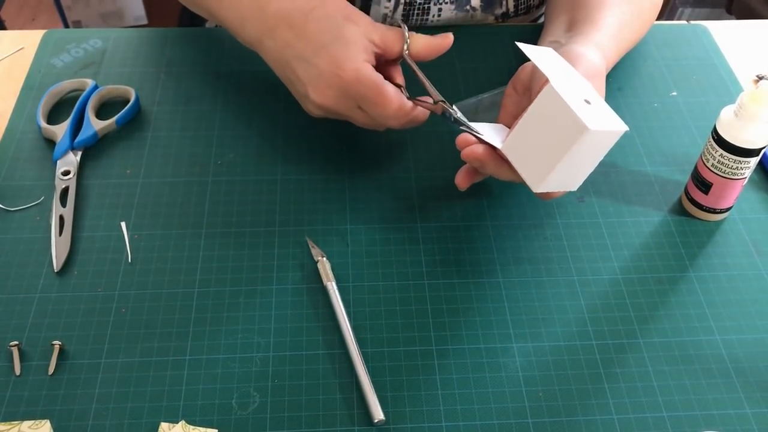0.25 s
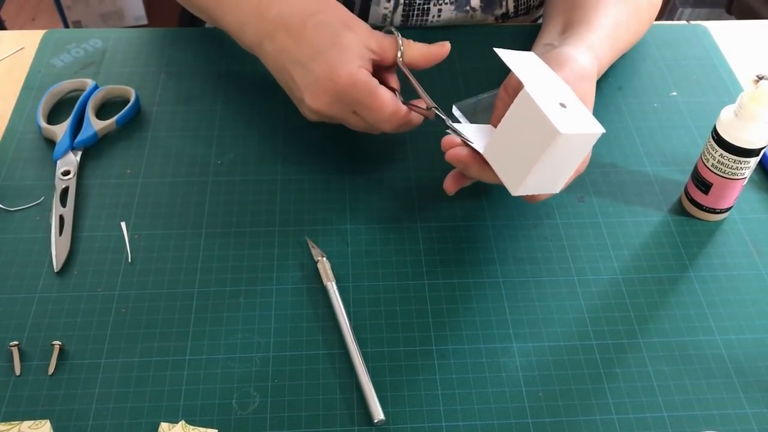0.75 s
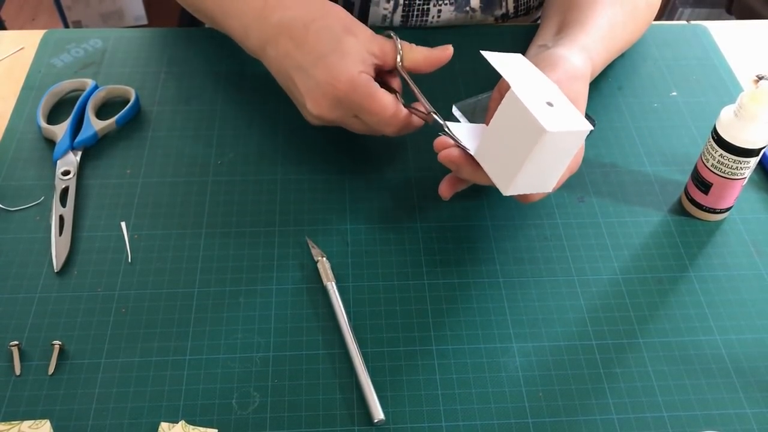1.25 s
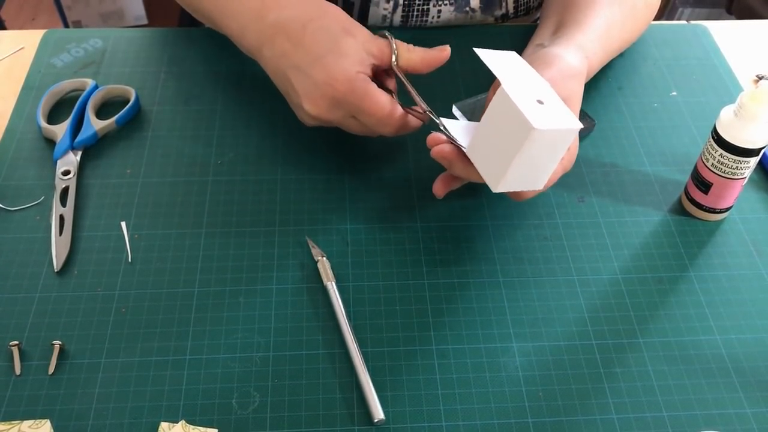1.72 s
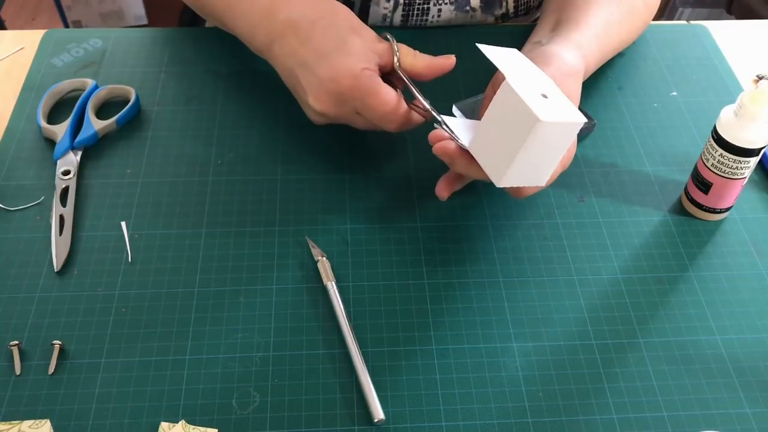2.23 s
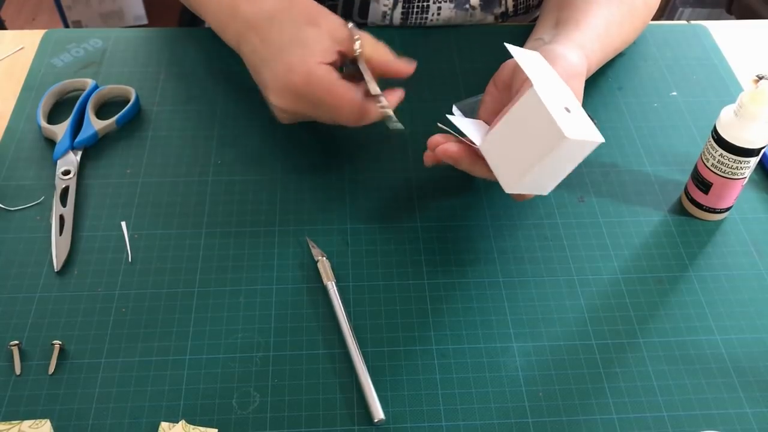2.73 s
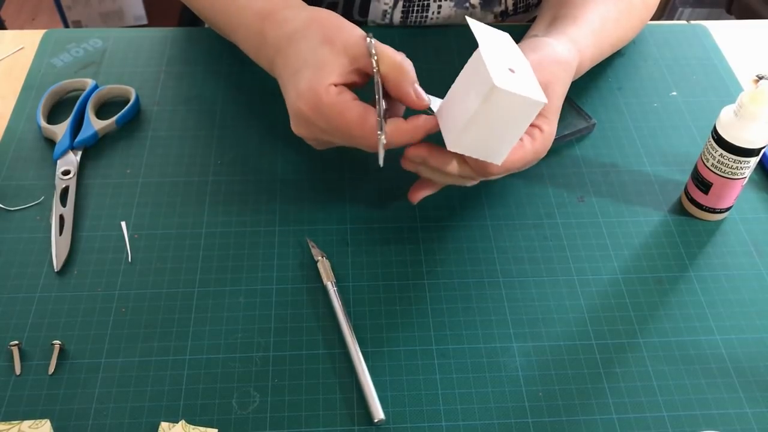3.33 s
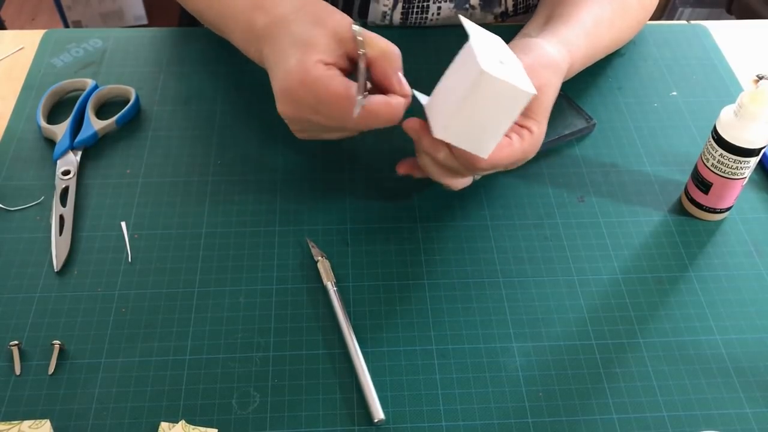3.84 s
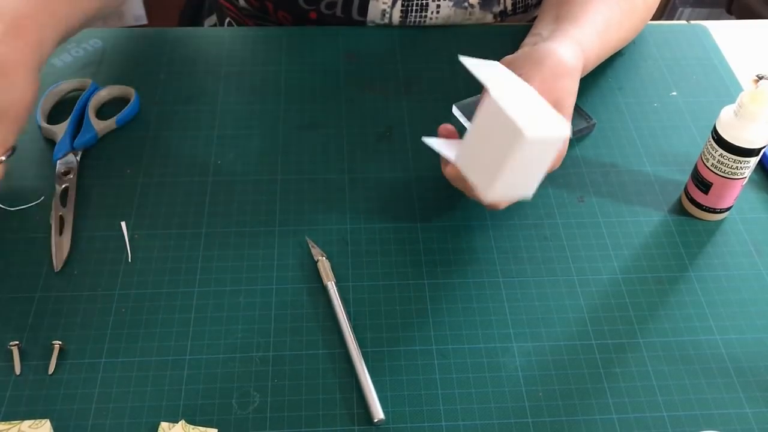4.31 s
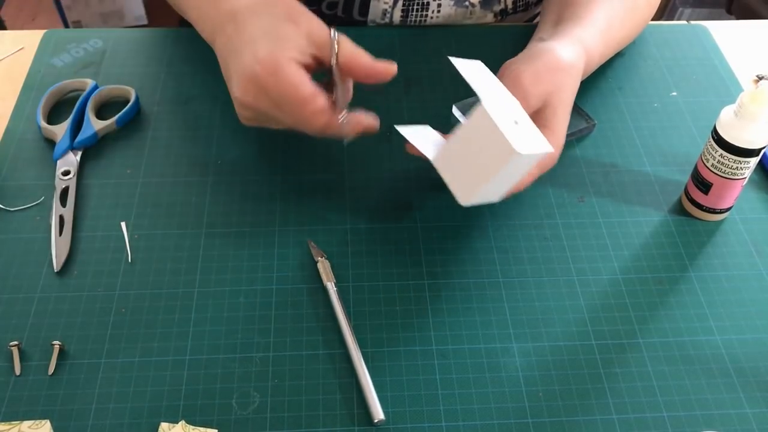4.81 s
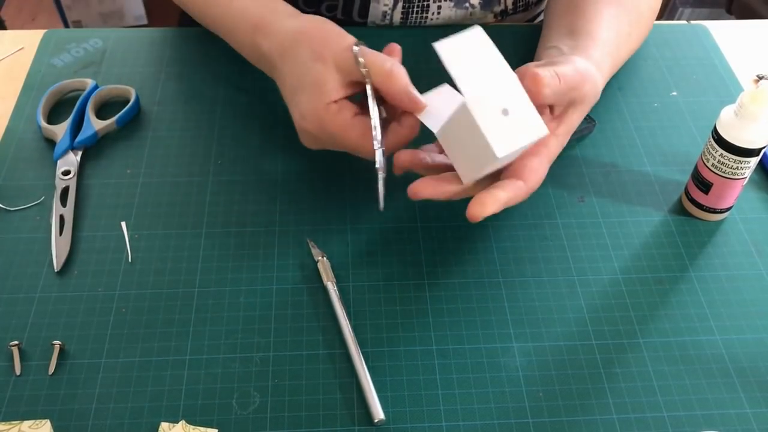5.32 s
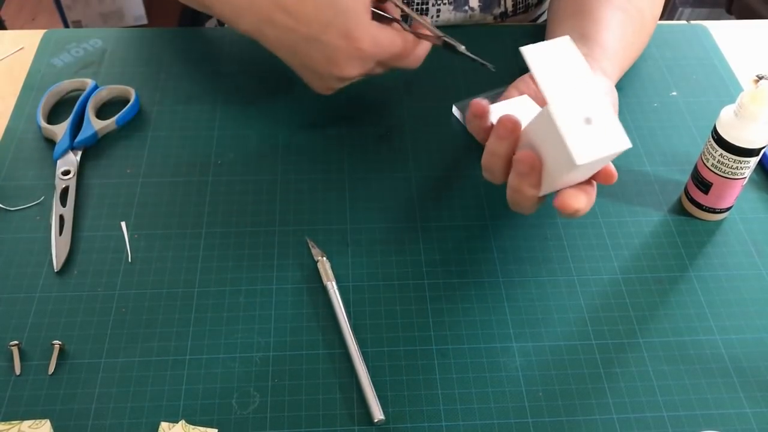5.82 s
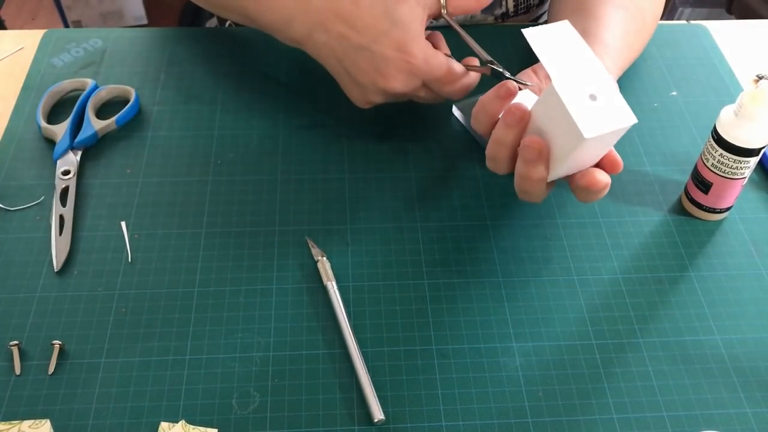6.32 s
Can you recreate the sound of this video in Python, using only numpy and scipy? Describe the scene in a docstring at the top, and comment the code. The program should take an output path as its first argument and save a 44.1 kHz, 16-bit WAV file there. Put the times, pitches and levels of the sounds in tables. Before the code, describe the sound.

Over a steady low hum, fibrous cardboard cutting ends in a crisp snip, followed by light handling ticks, a hollow flap flick and brief scrapes.

```python
"""A deep hum, soft hiss and faint regular swish fill a small room: tones, shaped noise and a pulsed narrow band.
Small scissors crunch along the flap of a cardboard box: grains of tearing fibre, coloured and rung by the box.
They close through its edge with a snap: damped modes, a crackle and an echo off the craft table.
Then fingers turn the box, rub it and flick a flap: dragged grains, ticks, scrapes, and modes over a low thump."""
import sys
import numpy as np
from scipy import signal
from scipy.fft import rfft, irfft
from scipy.io import wavfile
from scipy.ndimage import uniform_filter1d

SR = 44100
rng = np.random.default_rng(int(sys.argv[2]) if len(sys.argv) > 2 else 0)


def generate_wav(signal):
    """Clip the signal to [-1, 1] and save it as 16-bit WAV at the path in sys.argv[1]."""
    frames = np.transpose(np.atleast_2d(signal))
    scaled = np.clip(frames, -1, 1) * 32767
    pcm = np.round(scaled).astype(np.int16)
    wavfile.write(sys.argv[1], SR, pcm)


N = 289149
T = np.arange(N) / SR

HUM_HZ, HUM_RMS_DB = 56.67, -36.1
# weaker steady tones: (frequency [Hz], rms level before wander [dB])
WHINE_TONES = [(120, -69.5), (170, -76.5), (296, -81.5), (396, -84.5), (1046, -78)]
# rumble spectrum: (frequency [Hz], gain [dB])
RUMBLE_SPECTRUM = [(15, -15), (30, 0.5), (50, 1), (80, 4), (105, -5), (150, -5.5), (220, -7), (330, -34.5)]
# moving air spectrum: (frequency [Hz], gain [dB])
AIR_SPECTRUM = [(120, -30), (200, -7), (294, -0.5), (372, -4), (431, -5), (567, -4.5), (832, -10.5),
                (879, -21.5), (1020, -8.5), (1120, -17.5), (1360, -10.5), (2110, -14.5), (4310, -17.5),
                (4810, -20), (15800, -47.5)]
AIR_RMS_DB = -68.55

# blade pushes through card, about four a second:
# (start [s], length [s], level [dB], treble shelf [dB], box body over treble [dB])
PUSHES = [(0.175, 0.145, -66.5, 3, -4), (0.432, 0.19, -65.5, -3, -1), (0.727, 0.105, -62, 3, 0),
          (0.957, 0.1, -57, 1.5, 0), (1.155, 0.155, -66.5, 1, -2), (1.465, 0.155, -68.5, -4, 1),
          (1.825, 0.07, -63.5, 4, 4), (1.935, 0.075, -63.5, 1, 4.5)]
PUSH_ATTACK_S, PUSH_RELEASE_S, PUSH_SWELL_DB = .015, .025, 3
# fibre bundles giving way: (time [s], level [dB], treble shelf [dB], box body over treble [dB])
CRACKS = [(0.213, -60, -2, -10), (0.231, -56.5, -2, -6), (0.267, -58, -2, -5), (0.772, -57, 1, 2),
          (0.807, -56, 0, -4), (0.836, -60, 6, -6), (0.963, -54, -4, -10), (1.223, -57.5, -3, 5),
          (1.247, -59, 2, -9), (1.89, -52, 6, 7.5)]
CRACK_RISE_S, CRACK_DECAY_S = .002, .007
# tearing fibre spectrum: (frequency [Hz], gain [dB])
FIBRE_SPECTRUM = [(1180, -22), (2000, -8), (2320, -9), (2680, -4), (3110, -4), (3700, -8.5), (4470, -3.5),
                  (4710, -6.5), (4960, -18.5), (5450, -7), (7260, -11.5), (7840, -9.5), (9400, -15),
                  (15000, -27), (15800, -44)]
# hollow box resonances: (frequency [Hz], nominal width [Hz], gain [dB])
BOX_MODES = [(992, 200, 7.5), (1250, 200, -4), (1560, 320, -0.5)]

# reverb decay: (frequency [Hz], T60 [s])
ROOM_T60 = [(200, 0.25), (1000, 0.27), (3000, 0.31), (6000, 0.33), (14000, 0.24)]
# reverb tail over its input: (frequency [Hz], gain [dB])
ROOM_TAIL_GAIN = [(200, -6), (500, -9), (1100, -4.5), (3000, -9), (6000, -12), (14000, -13)]
# first wall echoes: (delay [s], gain over room input [dB])
WALL_ECHOES = [(.0108, -16), (.0125, -19.5), (.023, -27), (.031, -24)]

# slips of blades and card: (time [s], peak level [dB], rise + decay [s], ring [Hz], ring over scuff [dB])
TICKS = [(0.877, -61, .003, 7800, -3), (2.679, -40.5, .008, 5700, -10), (2.802, -60, .006, 6500, 4),
         (3.139, -56.5, .004, 4000, -8), (3.273, -49.5, .011, 3100, -5), (3.341, -59, .004, 3140, -3),
         (3.439, -57, .006, 3280, -5), (3.923, -60, .004, 8040, 0), (3.945, -48, .009, 980, -9),
         (4.356, -51, .004, 2780, 2), (4.555, -44.5, .003, 6400, 1), (5.0815, -39, .002, 4050, 1),
         (5.2075, -47, .006, 6900, 3), (6.048, -63, .014, 4000, -10)]
TICK_RISE_SHARE = .35
# scuff spectrum: (frequency [Hz], gain [dB])
SCUFF_SPECTRUM = [(200, -46), (500, 0), (1000, 5.5), (1500, 1.5), (2300, -2), (4300, -4.5), (4950, -4),
                  (5600, -7), (7500, -8), (10400, -18), (12000, -23), (16000, -28)]

# blade closure: (time [s], rms over 50 ms [dB], table echo delay [s], echo gain [dB])
SNAP_BLOW = (2.2823, -37, .00241, -6.5)
# blades closing through the edge: (frequency [Hz], nominal width [Hz], gain [dB])
SNAP_MODES = [(420, 200, -10), (910, 300, -3), (1240, 280, 2), (1720, 380, -5), (2080, 300, -15),
              (2480, 240, -4), (2980, 260, -1), (3780, 480, -6), (4430, 340, -9), (5450, 400, -10),
              (6200, 600, -12), (7500, 800, -15), (8600, 1000, -12), (10600, 1100, -18), (13700, 1800, -23)]

# finger slides: (start [s], length [s], hiss level before trim [dB], treble shelf [dB], box drone over hiss [dB])
RUBS = [(3.4, 0.06, -65.5, 0, -14), (3.555, 0.21, -65, -5, -1), (4.19, 0.105, -65, 4.5, -15),
        (4.335, 0.075, -66, -3, -12), (4.405, 0.12, -58.3, 5.5, -5), (4.485, 0.125, -62, -4, -9),
        (4.58, 0.185, -60.5, 1.5, -11), (4.755, 0.15, -64.5, -1, -12), (5.025, 0.085, -65, -4, -8),
        (5.1, 0.115, -64.5, -1, -9), (5.165, 0.063, -61, 4, -10), (5.455, 0.09, -71, -4, -10),
        (5.66, 0.31, -68, -10, -4), (5.79, 0.1, -62.5, -5, -12)]
RUB_ATTACK_S, RUB_RELEASE_S, RUB_SWELL_DB = .025, .03, 3
# skin on card spectrum: (frequency [Hz], gain [dB])
SKIN_SPECTRUM = [(760, -35), (1300, -14.5), (1740, -3.5), (2240, -6), (2760, -8), (3000, -1.5),
                 (3580, -6.5), (4100, -0.5), (4460, -3.5), (4900, -18), (5270, -7.5), (6990, -7),
                 (10200, -14), (15200, -22.5), (15800, -25)]

# flap release: (time [s], rms over 50 ms [dB], table echo delay [s], echo gain [dB])
FLICK_BLOW = (4.4001, -38, .0026, -13)
# stiff flap flicking free: (frequency [Hz], nominal width [Hz], gain [dB])
FLAP_MODES = [(265, 70, -4), (440, 70, -4), (820, 170, -1.5), (980, 120, -5), (1190, 220, 0),
              (1760, 340, 0), (2700, 600, -8), (3800, 320, -1), (4640, 280, -7), (5550, 650, 0),
              (6300, 650, 0), (8300, 900, -17), (9500, 800, -21), (12800, 3000, -32)]

# firm drags along a flap edge: (start [s], length [s], level [dB])
SCRAPES = [(5.528, 0.112, -52.8), (5.625, 0.07, -53)]
SCRAPE_ATTACK_S, SCRAPE_RELEASE_S, SCRAPE_SWELL_DB = .02, .05, 1
# flap squeak bands: (frequency [Hz], width per pass [Hz], gain [dB])
SQUEAK_BANDS = [(1750, 600, -4), (2410, 220, 4), (3070, 240, -2), (3980, 700, 0), (6100, 900, -1)]
# drag rasp spectrum: (frequency [Hz], gain [dB])
RASP_SPECTRUM = [(500, -20), (1400, -3), (4800, -4), (5500, 0), (8500, -2), (11000, -6), (16000, -9)]

LOWPASS_HZ = 15950


def amp(db):
    """Decibels to gain."""
    return 10 ** (np.asarray(db) / 20)


def unit(x):
    """Scales to rms 1."""
    return x / np.sqrt(np.mean(x ** 2) + 1e-20)


def read(points, hz):
    """Interpolates a table on a log-frequency axis."""
    f, value = np.transpose(points)
    return np.interp(np.log(hz + 1), np.log(f + 1), value)


def add(mix, s, sound):
    """Mixes a sound in at s seconds."""
    part = mix[round(s * SR):][:len(sound)]
    part += sound[:len(part)]


def colour(x, spectrum):
    """Filters by a gain table, at rms 1."""
    gain = amp(read(spectrum, np.fft.rfftfreq(len(x), 1 / SR)))
    return unit(irfft(rfft(x) * gain, len(x)))


def resonate(x, hz, width_hz):
    """One resonance of peak gain 1."""
    return signal.lfilter(*signal.iirpeak(min(hz, SR / 2 - 1), hz / width_hz, SR), x)


def wander(size, below_hz):
    """Slow noise of rms 1, limited to below_hz."""
    keep = np.fft.rfftfreq(size, 1 / SR) < below_hz
    return unit(irfft(rfft(rng.standard_normal(size)) * keep, size))


def grains(size, per_s, spread_db):
    """Random tiny clicks of unequal height, at rms 1."""
    height = amp(spread_db * np.minimum(rng.exponential(1, size), 4))
    struck = rng.random(size) < per_s / SR
    return unit(height * rng.choice([-1, 1], size) * struck)


def stroke(start_s, length_s, attack_s, release_s, swell_db):
    """Gain of one hand movement: takes hold, presses hardest midway, lets go."""
    t = T - start_s
    edges = np.clip(np.minimum(t / attack_s, (length_s - t) / release_s), 0, 1)
    return edges * amp(-swell_db * (2 * np.clip(t / length_s, 0, 1) - 1) ** 2)


def spike(t, rise_s, decay_s):
    """Gain that shoots up to 1 at t = 0 and dies away exponentially."""
    return np.exp(-abs(t) / np.where(t < 0, rise_s, decay_s))


def brighten(x, db):
    """Shelves the treble around 8 kHz and up."""
    high = signal.sosfilt(signal.butter(1, 8000, "high", fs=SR, output="sos"), x)
    return x + (amp(db) - 1) * high


def patchy(x, db, frames):
    """Shifts the tone, as the point of contact moves, by random time-frequency patches."""
    z = signal.stft(x, nperseg=256)[2]
    smooth = uniform_filter1d(rng.standard_normal(z.shape), 6, 0)
    patches = unit(uniform_filter1d(smooth, frames, 1))
    return unit(signal.istft(z * amp(db * patches), nperseg=256)[1][:len(x)])


def background(waver_db=.35, rumble_db=-63, whir_hz=1040, whir_width_hz=150, whir_db=-74):
    """Wavering hum, weaker tones, rumble, moving air and a narrow whir."""
    hum = amp(HUM_RMS_DB + waver_db * wander(N, below_hz=14)) * np.sin(2 * np.pi * HUM_HZ * T)
    whine = np.zeros(N)
    for hz, db in WHINE_TONES:
        level = amp(db + 2 * wander(N, below_hz=4.6))
        whine += level * np.sin(2 * np.pi * (hz * T + rng.random()))
    low, air, whir = rng.standard_normal((3, N))
    noise = amp(rumble_db) * colour(low, RUMBLE_SPECTRUM) + amp(AIR_RMS_DB) * colour(air, AIR_SPECTRUM)
    noise += amp(whir_db) * unit(resonate(whir, whir_hz, whir_width_hz))
    return np.sqrt(2) * (hum + whine) + noise  # sqrt(2): rms to sine peak


def swish(first_s=.023, period_s=.573, hz=2200, width_hz=520, db=-71, sigma_s=.037):
    """Narrow noise swells in Gaussian pulses at a fixed period, as from a turning fan."""
    offset_s = (T - first_s + period_s / 2) % period_s - period_s / 2
    whistle = unit(resonate(resonate(rng.standard_normal(N), hz, width_hz), hz, width_hz))
    return amp(db) * np.exp(-(offset_s / sigma_s) ** 2 / 2) * whistle


def box(x):
    """Hollow box ring: each resonance acts twice for steep skirts, widened to keep its overall width."""
    ring = np.zeros(len(x))
    for hz, width_hz, db in BOX_MODES:
        ring += amp(db) * resonate(resonate(x, hz, 1.6 * width_hz), hz, 1.6 * width_hz)
    return unit(ring)


def cutting(jerk_db=2, pop_db=-7, slip_db=1.2, shift_db=2.2):
    """Each push tears a run of fibres that crackle and shake the box; at times a whole bundle gives way."""
    fine = grains(N, per_s=5000, spread_db=.5) * amp(jerk_db * wander(N, below_hz=200))
    tears = unit(unit(fine) + amp(pop_db) * grains(N, per_s=320, spread_db=1.5))
    treble = patchy(colour(tears, FIBRE_SPECTRUM), shift_db, frames=12)
    body = box(tears)
    slips = unit(amp(slip_db * wander(N, below_hz=60)))
    out = np.zeros(N)
    for s, length_s, db, bright_db, box_db in PUSHES:
        force = slips * stroke(s, length_s, PUSH_ATTACK_S, PUSH_RELEASE_S, PUSH_SWELL_DB)
        out += amp(db) * force * (brighten(treble, bright_db) + amp(box_db) * body)
    for s, db, bright_db, box_db in CRACKS:
        burst = spike(T - s, CRACK_RISE_S, CRACK_DECAY_S)
        out += amp(db) * burst * (brighten(treble, bright_db) + amp(box_db) * body)
    return out


def room(x, gap_s=.006):
    """First echoes from nearby walls and a dense noise tail, each band dying at its own speed."""
    hz, t, z = signal.stft(rng.standard_normal(SR // 2), SR, nperseg=256)
    t60_s = read(ROOM_T60, hz)[:, None]
    unit_energy = np.sqrt(2 * np.log(1000) / (t60_s * SR))
    decay = np.exp(-np.log(1000) * t / t60_s)
    gain = amp(read(ROOM_TAIL_GAIN, hz))[:, None]
    tail = signal.istft(z * unit_energy * gain * decay, SR, nperseg=256)[1]
    echoes = np.zeros(N)
    add(echoes, gap_s, signal.fftconvolve(x, tail))
    dull = signal.sosfilt(signal.butter(2, 3800, fs=SR, output="sos"), x)
    for delay_s, db in WALL_ECHOES:
        add(echoes, delay_s, amp(db) * dull)
    return echoes


def ticks(q=6):
    """Short slips swell and stop, each ringing one resonance of blade or card."""
    t, out = np.arange(-SR // 20, SR // 10) / SR, np.zeros(N)
    for s, db, length_s, hz, ring_db in TICKS:
        slip = rng.standard_normal(len(t))
        ring = unit(resonate(slip, hz, hz / q))
        sound = unit(colour(slip, SCUFF_SPECTRUM) + amp(ring_db) * ring)
        envelope = spike(t, TICK_RISE_SHARE * length_s, (1 - TICK_RISE_SHARE) * length_s)
        add(out, s + t[0], amp(db) * sound * envelope)
    return out


def strike(blow, modes, spread_s=.0001):
    """A sharp release rings well-damped modes; the table throws back a duller copy."""
    s, level_db, delay_s, echo_db = blow
    t, out = np.arange(SR // 20) / SR, np.zeros(N)
    hz, width_hz, db = np.transpose(modes)[:, :, None]
    # bending waves delay the bass: spread_s at 1 kHz
    age_s = np.maximum(t - spread_s * np.sqrt(1000 / hz), 0)
    damping = np.sqrt(2) * np.pi * width_hz
    envelope = damping ** 2 * age_s * np.exp(-damping * age_s)
    ring = amp(db) * envelope * np.sin(2 * np.pi * hz * age_s)
    click = amp(level_db) * unit(ring.sum(0))
    add(out, s, click)
    dull = signal.sosfilt(signal.butter(1, 7000, fs=SR, output="sos"), click)
    add(out, s + delay_s, amp(echo_db) * dull)
    return out


def shudder(s, crackle_db, crackle_s, box_db, box_s):
    """After a release the card crackles (crackle_db before the shelf) and the box shakes longer."""
    crackle = brighten(colour(grains(N, per_s=12000, spread_db=1), SCUFF_SPECTRUM), db=12)
    shake = box(rng.standard_normal(N))
    return (amp(crackle_db) * spike(T - s, rise_s=.0001, decay_s=crackle_s) * crackle
            + amp(box_db) * spike(T - s, rise_s=.0001, decay_s=box_s) * shake)


def snap():
    """Blades close through the edge: damped modes, then crackle and box shake."""
    shake = shudder(s=2.283, crackle_db=-33, crackle_s=.002, box_db=-37, box_s=.007)
    return strike(SNAP_BLOW, SNAP_MODES) + shake


def blades(start_s=2.68, length_s=.145, db=-68, ring_hz=6450, width_hz=700):
    """Steel slides on steel with a thin ring as the scissors open."""
    drag = grains(N, per_s=2500, spread_db=3)
    opening = amp(db) * stroke(start_s, length_s, attack_s=.015, release_s=.015, swell_db=3)
    return opening * unit(unit(resonate(drag, ring_hz, width_hz)) + colour(drag, SCUFF_SPECTRUM))


def fingers(trim_db=.7, uneven_db=1.4, shift_db=2):
    """Skin drags over card: a fine hiss, and a drone from the box."""
    drag = grains(N, per_s=9000, spread_db=2.5) * amp(uneven_db * wander(N, below_hz=64))
    hiss = patchy(colour(drag, SKIN_SPECTRUM), shift_db, frames=20)
    drone = box(drag)
    out = np.zeros(N)
    for s, length_s, db, bright_db, drone_db in RUBS:
        force = amp(db + trim_db) * stroke(s, length_s, RUB_ATTACK_S, RUB_RELEASE_S, RUB_SWELL_DB)
        out += force * (brighten(hiss, bright_db) + amp(drone_db) * drone)
    return out


def flick():
    """A stiff flap springs free: damped modes, then crackle and box shake."""
    shake = shudder(s=4.4005, crackle_db=-42, crackle_s=.004, box_db=-42, box_s=.022)
    return strike(FLICK_BLOW, FLAP_MODES) + shake


def thump(s=4.402, hz=124, db=-51, decay_s=.04):
    """The flick gives the whole box a low push: one decaying sine."""
    t, out = np.arange(SR // 3) / SR, np.zeros(N)
    add(out, s, amp(db) * np.exp(-t / decay_s) * np.sin(2 * np.pi * hz * t))
    return out


def scrape(rasp_db=-1.5, uneven_db=1.2, drone_db=-14):
    """Quick slips along an edge rasp brightly and ring the flap in several narrow bands."""
    drag = grains(N, per_s=12000, spread_db=.5) * amp(uneven_db * wander(N, below_hz=94))
    squeak = np.zeros(N)
    for hz, width_hz, db in SQUEAK_BANDS:
        squeak += amp(db) * resonate(resonate(drag, hz, width_hz), hz, width_hz)
    rasp = colour(grains(N, per_s=12000, spread_db=1.5), RASP_SPECTRUM)
    force = np.zeros(N)
    for s, length_s, db in SCRAPES:
        force += amp(db) * stroke(s, length_s, SCRAPE_ATTACK_S, SCRAPE_RELEASE_S, SCRAPE_SWELL_DB)
    sound = unit(squeak) + amp(rasp_db) * rasp + amp(drone_db) * box(drag)
    return force * patchy(sound, db=2, frames=16)


def scene(soft_room_db=-3, flick_room_db=-2):
    """Scissors and hands close by, in the humming room; room gains trim the echo sends."""
    snap_sound, flick_sound = snap(), flick()
    soft = cutting() + ticks() + blades() + fingers() + scrape()
    echoes = room(snap_sound + amp(flick_room_db) * flick_sound + amp(soft_room_db) * soft)
    close = snap_sound + flick_sound + soft + thump()
    return (background() + swish() + close + echoes)[None]


def record(dry):
    """Steep linear-phase low-pass at LOWPASS_HZ."""
    taps = signal.firwin(511, LOWPASS_HZ, window=("kaiser", 9), fs=SR)
    return signal.oaconvolve(dry, taps[None], "same")


dry = scene()
out = record(dry)
generate_wav(out)
```